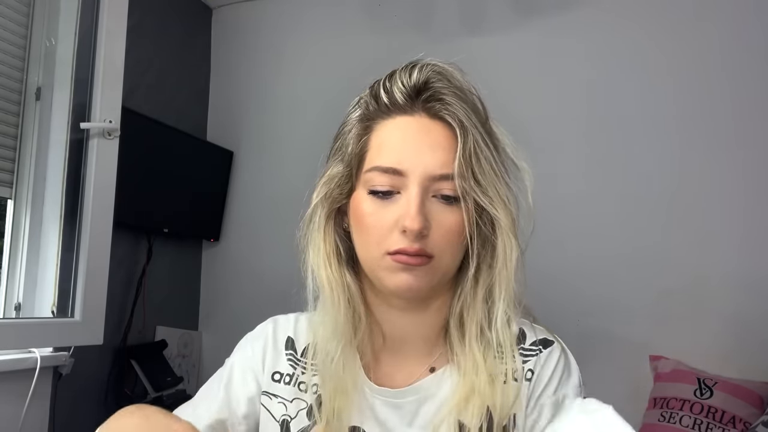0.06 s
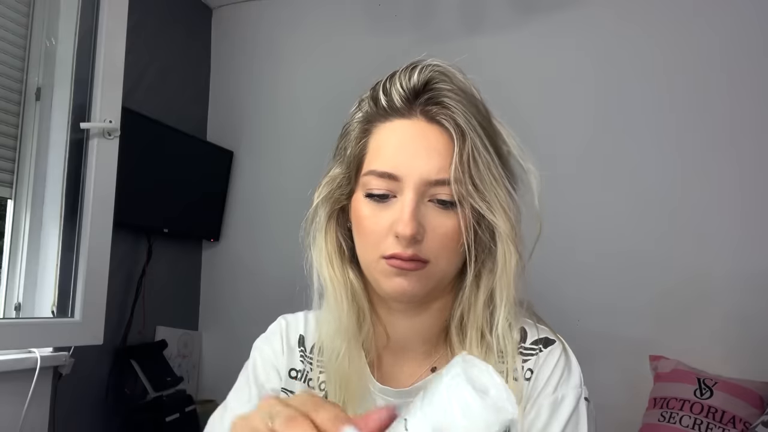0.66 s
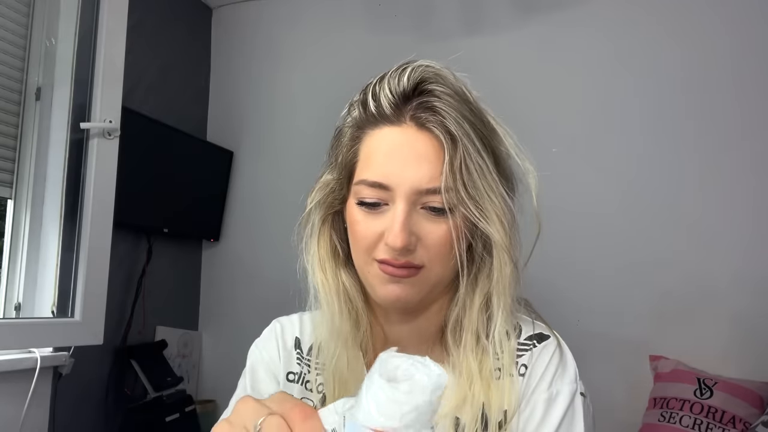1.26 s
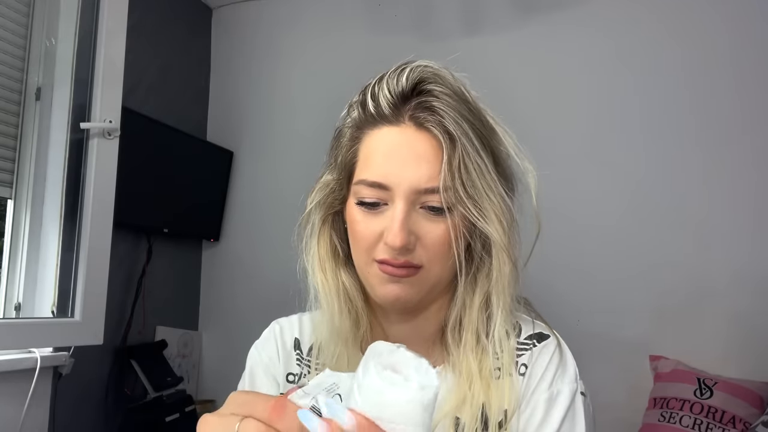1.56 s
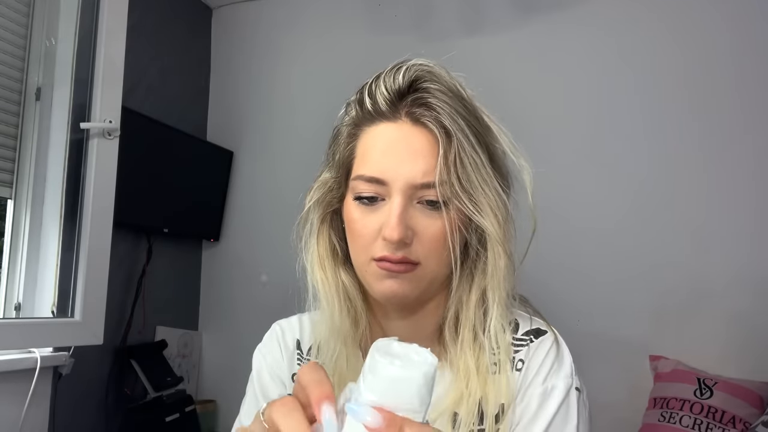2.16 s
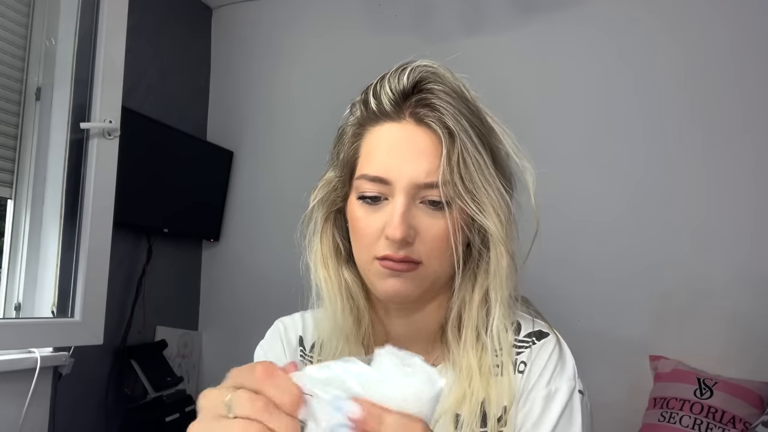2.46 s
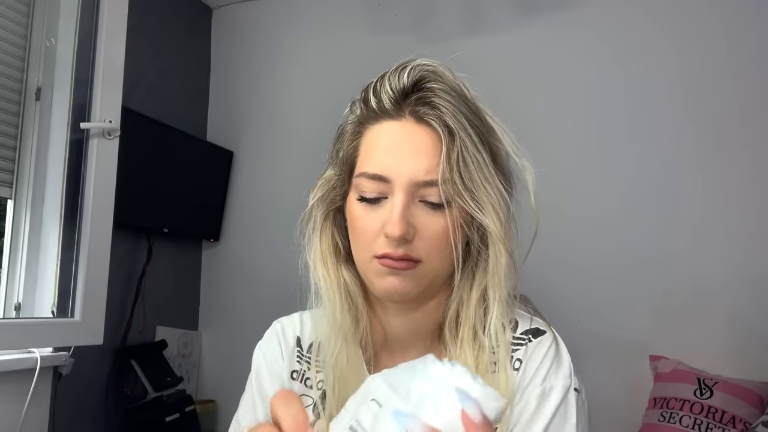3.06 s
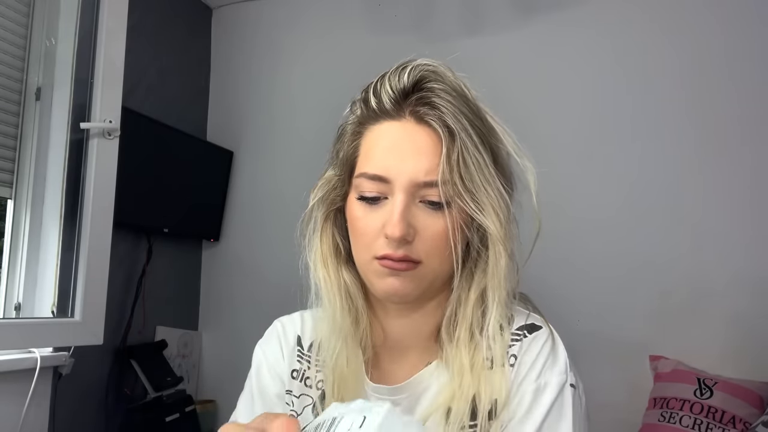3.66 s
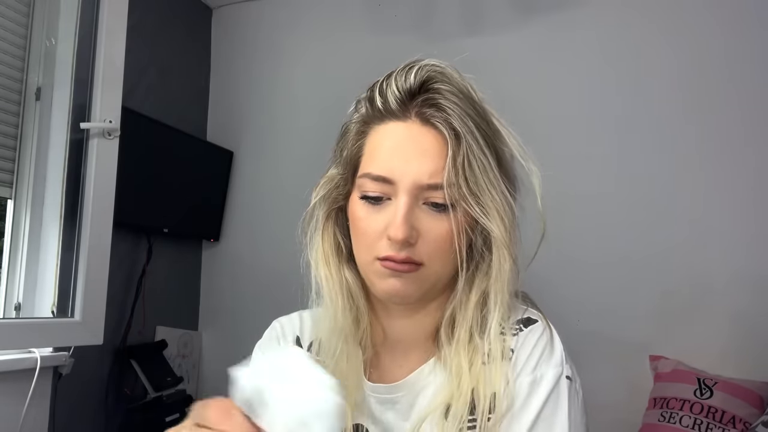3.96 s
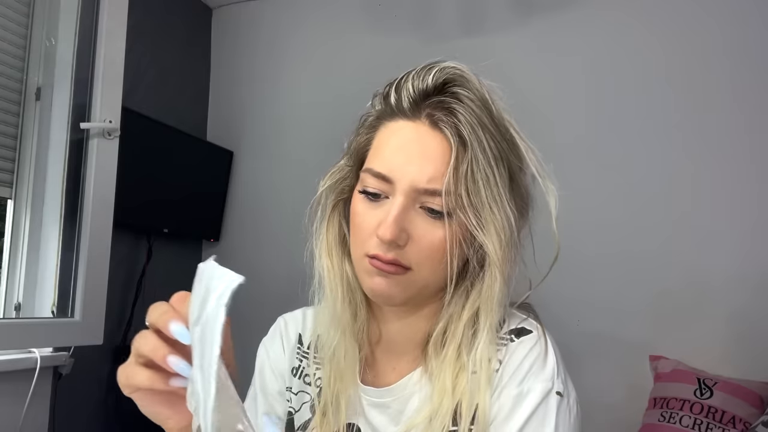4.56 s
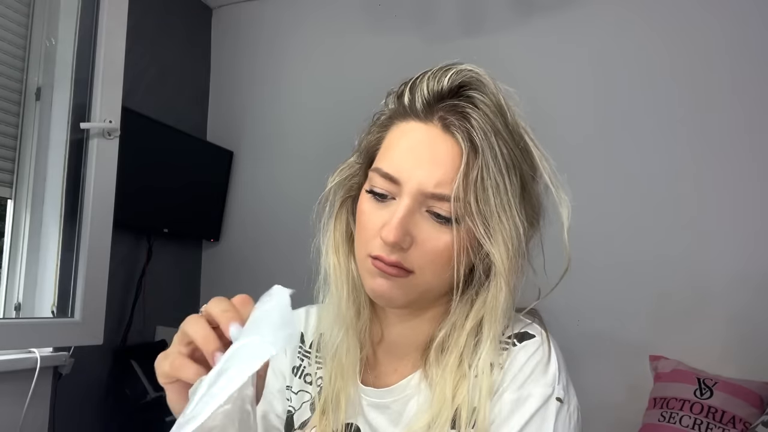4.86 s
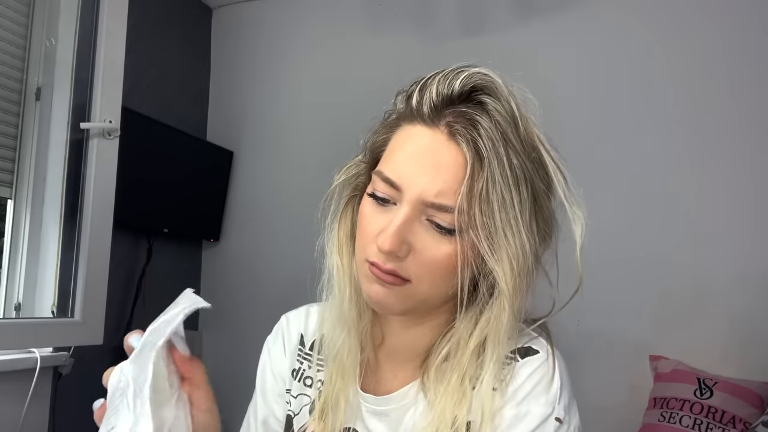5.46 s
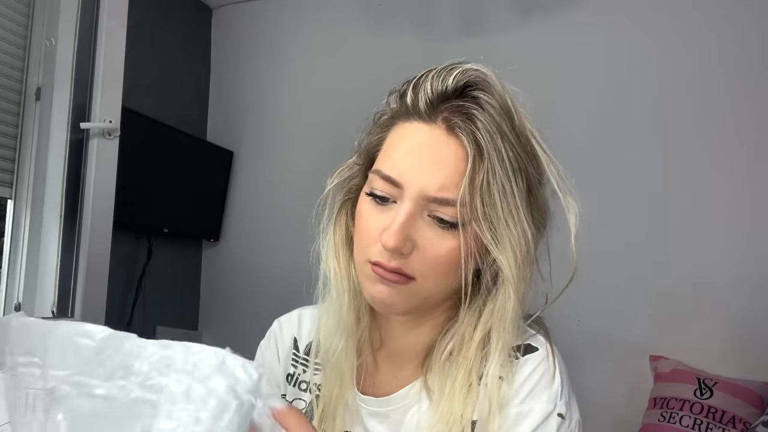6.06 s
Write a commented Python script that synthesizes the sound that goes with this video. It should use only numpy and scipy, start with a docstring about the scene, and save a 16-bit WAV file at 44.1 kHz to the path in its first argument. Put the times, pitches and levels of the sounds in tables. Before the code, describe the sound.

Close, uneven crinkling of a thin plastic bag being pulled open by hand, with sharp snaps and hollow pops indoors.

```python
"""Handling a plastic mailer bag

A plastic bag is tugged open and turned over by hand in a small room, close to a stereo microphone.
Thin film buckles in sudden steps: tiny creases make a steady crinkle, big ones snap alone or in runs.
Taut film pops, stiff folds knock, slack panels flop and a finger squeaks once by stick-slip friction.
Pops and flops excite the room's low modes. Signal pairs are sum and difference until the final mix."""
import sys
import numpy as np
from scipy import signal
from scipy.fft import rfft, irfft
from scipy.io import wavfile

SR = 44100
rng = np.random.default_rng(int(sys.argv[2]) if len(sys.argv) > 2 else 0)


def master(y):
    """Save y as 16-bit WAV."""
    cut = np.clip(np.atleast_2d(y).T, -1, 1)
    pcm = np.round(cut * 32767)  # scale
    wavfile.write(sys.argv[1], SR, pcm.astype(np.int16))


N = 278271
TIME = np.arange(N) / SR

# Tugs, squeezes and turns of the hands: t/s, duration/s, crinkle level/dB, rustle level/dB
HAND_STROKES = [(0.0, 0.0028, -45, -42), (0.142, 0.034, -55, -47), (0.254, 0.018, -64, -43.5),
                (0.367, 0.069, -71, -37.5), (0.785, 0.12, -54.5, -57.5), (0.922, 0.063, -50.5, -46.5),
                (1.083, 0.15, -54.5, -53), (1.233, 0.049, -42.5, -64), (1.35, 0.13, -48, -68),
                (1.474, 0.04, -34, -45), (1.71, 0.11, -47.5, -53), (1.776, 0.07, -52, -43),
                (1.907, 0.029, -60, -47), (2.041, 0.02, -47.5, -48), (2.202, 0.3, -51.5, -50.5),
                (2.41, 0.18, -45, -69), (2.455, 0.053, -34, -43), (2.6, 0.11, -44, -49),
                (2.707, 0.1, -45, -43.5), (2.883, 0.065, -49.5, -46), (2.981, 0.072, -42, -45.5),
                (3.16, 0.046, -45, -41.5), (3.245, 0.28, -41.5, -43.5), (3.61, 0.079, -45.5, -45.5),
                (3.69, 0.051, -48.5, -65), (3.814, 0.056, -40.5, -40), (3.887, 0.11, -46, -53),
                (4.005, 0.06, -35.5, -42.5), (4.138, 0.13, -47.5, -51.5), (4.3, 0.056, -41.5, -47),
                (4.503, 0.12, -47, -47.5), (4.66, 0.08, -62, -48.5), (4.785, 0.085, -46.5, -50.5),
                (4.854, 0.15, -44, -51.5), (5.013, 0.068, -47.5, -65), (5.153, 0.061, -47, -48),
                (5.342, 0.15, -50, -54.5), (5.504, 0.29, -45.5, -48), (5.653, 0.098, -42, -45),
                (5.92, 0.11, -47.5, -49), (6.042, 0.06, -50.5, -47.5), (6.158, 0.074, -52, -46.5)]
# Faint crinkle under the holding fingers: t/s, level/dB
GRIP_LEVEL = [(0.0, -59), (0.09, -65), (0.2, -64), (0.73, -65), (0.9, -59.5), (1.4, -48), (1.63, -58),
              (2.4, -51), (2.86, -64), (3.13, -54.5), (3.4, -52), (4.3, -51), (5.4, -50), (6.3, -52.5)]


def handling(attack_s=0.0066, release_s=0.014, grip_rustle_db=-5.0):
    """Incoherent addition: grip and strokes sum in power to give the crinkle and rustle envelopes."""
    power = from_db(in_time(GRIP_LEVEL) + np.array([[0], [grip_rustle_db]])) ** 2
    t = TIME[:SR]
    for start, duration, crinkle_db, rustle_db in HAND_STROKES:
        shape = np.minimum(t / attack_s, 1) * np.exp(-np.maximum(t - duration, 0) / release_s)
        add(power, start, (from_db([[crinkle_db], [rustle_db]]) * shape) ** 2)
    return np.sqrt(power)


# Spectra of small creases and of broad folds: f/Hz, relative level/dB
CRINKLE_SPECTRUM = [(200, -1), (700, -13), (1500, 1.5), (2300, 1), (3000, 4.5), (4500, 4), (8000, 3.5),
                    (10000, 5.5), (13000, -8.5), (16000, -16)]
RUSTLE_SPECTRUM = [(100, -46), (250, -4.5), (450, 0.5), (750, 2.5), (1200, -4.5), (2000, -5.5),
                   (5000, -24.5)]


def crinkle(crinkle_envelope, rustle_envelope, rustle_db=-4.0):
    """Buckling noise: small creases crackle brightly, broad folds rustle lower, as the hands work."""
    small = creases(per_s=2600, spread_db=3.5, clump_db=4.5, ring_s=0.0009, patches=20)
    bright = flex(colour(small, CRINKLE_SPECTRUM))
    broad = creases(per_s=1200, spread_db=5.0, clump_db=1.0, ring_s=0.0015, patches=10)
    dull = colour(broad, RUSTLE_SPECTRUM)
    return crinkle_envelope * bright + rustle_envelope * from_db(rustle_db) * dull


def creases(per_s, spread_db, clump_db, ring_s, patches):
    """Shot noise: clumps of very unequal buckling impulses ring several patches of film; unit rms."""
    buckles = rng.random(N) < per_s * from_db(clump_db * drift(70)) / SR
    sizes = from_db(spread_db * np.minimum(rng.exponential(1, N), 4.5)) * rng.choice([-1, 1], N)
    patch = rng.integers(0, patches, N)
    impulses = (buckles * sizes)[None]
    return unit_rms(sum(convolve(impulses * (patch == k), burst(ring_s, 256)) for k in range(patches)))


def flex(sound, span_hz=(1400, 6300), swing_db=0.5, per_s=14, q=5.0):
    """Time-varying resonance: broad peaks swell and fade as the film changes shape; unit rms."""
    for hz in np.geomspace(*span_hz, 7):
        sound = resonate(sound, hz, q, swing_db * drift(per_s))
    return unit_rms(sound)


# The biggest creases flipping: t/s, level/dB, panel f/Hz, treble lift/dB
BIG_SNAPS = [(0.163, -32, 2100, -15), (0.243, -34, 5000, 6), (0.266, -25.5, 3580, -29),
             (0.3808, -17.5, 2250, -1), (0.4288, -16, 1500, 4), (0.4312, -7.5, 4350, 7.5),
             (0.448, -12.5, 4200, -16), (0.4621, -37, 725, -20), (0.767, -35.5, 710, 7),
             (1.1302, -30.5, 1400, 2), (1.152, -20.5, 4640, 1), (1.2365, -22.5, 1700, -21),
             (1.254, -22.5, 554, -10), (1.316, -30, 1900, -12), (1.3478, -23.5, 2000, 2),
             (1.3525, -24.5, 2070, 7), (1.4762, -29, 4160, 8), (1.5153, -27, 2020, -10),
             (1.5311, -29.5, 4550, -10), (1.7988, -34, 4000, 9.5), (2.049, -31.5, 2760, 4),
             (2.135, -29.5, 5500, -5), (2.2924, -26, 4200, 9), (2.365, -37, 477, 11), (2.449, -36, 5100, 2),
             (2.4812, -30, 3000, 0), (2.507, -27.5, 620, 8), (2.373, -32.5, 4000, -10),
             (2.7738, -29.5, 2920, -16), (2.8984, -32.5, 4130, 7), (2.9416, -34, 3930, 5),
             (3.033, -35, 5000, 16), (3.184, -34, 1880, 4), (3.285, -28.5, 1910, -13),
             (3.341, -24.5, 2970, -19), (3.4079, -20.5, 1500, 4), (3.4139, -26, 5900, 12),
             (3.43, -27, 6070, 0), (3.4683, -25, 480, -17), (3.5135, -29, 810, -18),
             (3.775, -35, 4320, 11.5), (3.8257, -33, 5000, -6), (3.912, -39, 4060, -14),
             (3.9249, -33, 4500, -15), (3.9706, -31, 4900, 3), (4.01, -26.5, 3200, 14),
             (4.016, -28.5, 1740, 5), (4.06, -25, 2900, -15), (4.1333, -33, 4060, -10),
             (4.1647, -35, 3800, 14), (4.2148, -27, 3670, 6), (4.296, -26, 5000, -18),
             (4.338, -27, 4300, -12), (4.38, -27.5, 2920, -17), (4.3985, -37, 4650, 20.5),
             (4.4115, -33.5, 5230, 1), (4.478, -32.5, 2730, -12), (4.5106, -27, 4200, -15),
             (4.5155, -41, 3200, -18), (4.6547, -30, 4140, 4), (4.667, -34, 3270, -8),
             (4.8547, -29, 4140, -14), (4.9088, -28.5, 4240, -20), (4.973, -29.5, 4400, -6),
             (5.145, -32, 5030, 9), (5.1615, -30.5, 4040, -15.5), (5.2162, -29.5, 4620, 11.5),
             (5.272, -35, 3220, -10), (5.3592, -30.5, 4220, 3), (5.451, -29, 4560, 4),
             (5.4645, -34, 4630, 6), (5.489, -34, 5000, 7), (5.571, -33.5, 3630, -17),
             (5.636, -31, 5000, 5), (5.684, -28, 5000, 10), (5.6964, -12, 4700, -11),
             (5.7875, -30.5, 2950, 10), (5.814, -36, 4600, 14), (5.988, -28.5, 450, -19),
             (6.163, -37, 2160, 6), (6.2196, -33, 4120, 11.5)]
# Spectrum of a crease's tick: f/Hz, relative level/dB
TICK_SPECTRUM = [(200, -2.5), (700, -8.5), (1600, 3), (3000, 3.5), (5000, 1.5), (8000, 3), (10000, 0.5),
                 (13000, -17.5), (16000, -37)]


def snaps(rows, tick_db=-2.0, top_db=6.0, panel_db=0.5, tight_hz=4500, db_per_octave=3.5):
    """Snap-through buckling: a crease ticks and shakes its panel, a tight one more than a slack one."""
    ticks, panels = np.zeros((2, 2, N))
    for start, db, hz, lift_db in rows:
        body = burst(decay_s=0.0017)
        body *= rise(TIME[:body.shape[1]], rise_s=0.00028)
        top = from_db(lift_db + top_db) * highpass(burst(decay_s=0.00056), hz=9500)
        add(ticks, start, from_db(db + tick_db) * (body + top))
        ring_db = db + panel_db - db_per_octave * np.log2(tight_hz / hz)
        add(panels, start, from_db(ring_db) * panel(hz, cycles=4.26, spread=0.233))
    return colour(ticks, TICK_SPECTRUM) + panels


def snap_edges(edge_db=-14.0):
    """Direct sound: the bright edge of a big snap reaches both channels at once, dry and centred."""
    out = np.zeros((1, N))
    for start, db, _, lift_db in BIG_SNAPS:
        add(out, start, from_db(db + lift_db + edge_db) * burst(decay_s=0.00015)[:1])
    return highpass(out, hz=8500)


def stray_snaps(crinkle_envelope, per_s=7.8, above_db=15, spread_db=4.5, max_db=-44.5, lift_db=12):
    """Poisson process: rows of lesser snaps at random times, scaled to the crinkle around them."""
    wait, pitch, size = rng.random((3, 160))
    times = np.cumsum(-np.log(1 - wait)) / per_s
    crinkle_db = 20 * np.log10(np.interp(times, TIME, crinkle_envelope))
    levels = np.minimum(crinkle_db + above_db + spread_db * (2 * size - 1), max_db)
    panel_hz = np.interp(pitch, [0, 1], [1500, 5000])
    return [(start, db, hz, lift_db) for start, db, hz in zip(times, levels, panel_hz) if start < TIME[-1]]


# Runs of creases giving way: t/s, level/dB, decay time/s, treble lift/dB
CREASE_RUNS = [(0.425, -30, 0.0027, -20), (0.452, -31, 0.0033, -20), (0.458, -39, 0.011, -18),
               (1.357, -42, 0.0095, -2), (1.478, -30, 0.018, -16), (2.483, -30, 0.044, -6),
               (3.315, -38.5, 0.066, -12), (3.4, -40, 0.014, -10), (3.408, -36, 0.038, -8),
               (5.695, -23, 0.0055, -15), (5.703, -40, 0.073, -5)]


def crumples():
    """Avalanche: one crease trips its neighbours in a dying run of clicks; tight film adds a sizzle."""
    envelopes, t = np.zeros((2, N)), TIME[:16384]
    for start, db, decay_s, lift_db in CREASE_RUNS:
        shape = rise(t, rise_s=0.00068) * np.exp(-(t / decay_s) ** 2)
        add(envelopes, start, from_db([[db], [db + lift_db]]) * shape)
    run, sizzle = envelopes
    clicks = creases(per_s=5400, spread_db=3.5, clump_db=6.5, ring_s=0.00031, patches=20)
    return run * colour(clicks, TICK_SPECTRUM) + sizzle * highpass(clicks, hz=11000)


# Taut film letting go: t/s, level/dB, f/Hz, leftward bias/dB
FILM_POPS = [(0.383, -26, 514, 10), (0.429, -20, 1090, 22), (0.442, -20, 563, 10), (0.463, -18, 710, 0.5),
             (1.133, -37, 850, 20), (1.152, -40, 1400, 23), (1.254, -39.5, 577, -4), (1.35, -40, 1500, 20),
             (1.485, -35, 440, 1), (2.362, -39, 316, 0), (2.42, -38, 580, 12), (2.48, -29, 1180, 0),
             (2.502, -23.5, 590, 24), (2.723, -35, 540, 22), (2.74, -37, 710, 17), (3.039, -34.5, 745, -1),
             (3.298, -42, 890, -1), (3.342, -39, 1100, 9), (3.409, -25.5, 1590, 9), (3.485, -37.5, 580, 9),
             (3.84, -38.5, 372, -3.5), (4.033, -37.5, 368, 15), (4.064, -30.5, 1150, 8),
             (4.317, -41, 750, 6), (4.511, -37, 900, 5), (4.587, -43.5, 790, 4), (5.672, -36, 980, 5),
             (5.682, -32, 685, -5), (5.699, -29, 880, 3), (5.715, -39, 810, 9), (5.747, -38.5, 920, 17),
             (5.873, -44, 594, 8), (5.931, -42.5, 740, 19), (6.057, -39.5, 670, 14)]
# Spectrum of the puff of air: f/Hz, relative level/dB
PUFF_SPECTRUM = [(50, -16), (120, -12), (230, -20), (400, -4), (650, -9), (850, -10), (1100, -12),
                 (2000, -12.5), (5000, -24.5), (12000, -49)]


def pops(puff_db=-2.0, lean=0.87):
    """Sudden release of tension: stretched film gives a puff of air and a hollow ring to one side."""
    puffs, rings = np.zeros((2, 2, N))
    for start, db, hz, left_db in FILM_POPS:
        ring = panel(hz, cycles=2.9, spread=0.252)
        pan = np.tanh(lean * np.log(from_db(left_db)))
        add(rings, start, from_db(db) * (ring + pan * ring[::-1]))
        add(puffs, start, from_db(db + puff_db) * burst(decay_s=0.008))
    return rings + colour(puffs, PUFF_SPECTRUM)


# Stiff folds giving way: crest t/s, level/dB, f/Hz, leftward bias/dB
FOLD_KNOCKS = [(0.4300, -4, 590, 6), (0.4445, -14, 400, -2), (0.4638, -12.5, 930, 3), (0.4800, -13, 650, 5),
               (1.489, -40, 390, 5), (1.816, -37, 422, 9), (3.044, -26, 510, 12), (3.412, -25, 396, 2),
               (3.513, -32, 744, 2), (4.034, -27, 397, 11), (4.667, -40, 567, 5), (5.683, -25.5, 425, 15),
               (5.701, -37, 750, 2)]


def knocks(cycles=0.57, lean=0.93):
    """Pressure pulse: a stiff fold gives the air one hard push that swings back at once."""
    out, t = np.zeros((2, N)), TIME[:512] - TIME[256]
    for crest, db, hz, left_db in FOLD_KNOCKS:
        push = -np.cos(2 * np.pi * hz * t) * np.exp(-(t * hz / cycles) ** 2)
        pan = np.tanh(lean * np.log(from_db(left_db)) / 2)
        add(out, crest + t[0], from_db(db) * push * np.array([[1], [pan]]))
    return out


# Slack panels flipping over: t/s, level/dB, first f/Hz, final f/Hz, slackening time/s, decay time/s
PANEL_FLOPS = [(0.38, -20.5, 416, 237, 0.0029, 0.019), (0.386, -30, 200, 105, 0.0038, 0.02),
               (0.427, -16.5, 475, 306, 0.0012, 0.018), (0.440, -17, 338, 207.5, 0.0059, 0.015),
               (0.443, -18, 302, 61, 0.0027, 0.021), (0.463, -22, 300, 133, 0.0023, 0.012),
               (0.464, -14.5, 332, 240, 0.002, 0.017), (2.544, -33.5, 500, 94, 0.0035, 0.021),
               (3.042, -24, 660, 99, 0.0027, 0.02), (3.342, -32.5, 400, 137, 0.0026, 0.013),
               (3.409, -25.5, 490, 111, 0.0034, 0.022), (3.709, -29, 410, 297, 0.0037, 0.011),
               (3.725, -25.5, 258, 132, 0.0031, 0.004), (3.825, -34, 261, 100, 0.0051, 0.038),
               (4.033, -32, 400, 74.6, 0.0035, 0.023), (5.355, -32.5, 603, 137, 0.0037, 0.0061),
               (5.719, -24, 250, 70.4, 0.0014, 0.013), (5.764, -26.5, 200, 67.6, 0.0028, 0.023),
               (5.987, -24, 576, 187, 0.0039, 0.0085), (6.21, -33, 298, 75, 0.0032, 0.022)]


def flops():
    """Membrane vibration: the pitch of a flipped panel falls as the tension leaves it."""
    out, t = np.zeros((2, N)), TIME[:8192]
    for start, db, first_hz, final_hz, slacken_s, decay_s in PANEL_FLOPS:
        hz = final_hz + (first_hz - final_hz) * np.exp(-t / slacken_s)
        phase = 2 * np.pi * np.cumsum(hz) / SR
        swing = from_db(db) * rise(t, rise_s=0.0025) * np.exp(-t / decay_s)
        # the difference channel follows the pressure slope
        add(out, start, swing * np.array([np.sin(phase), np.cos(phase) / 2]))
    return colour(out, [(22, -40), (38, -4), (55, -0.5)], keep_power=False)


# A finger sliding over the film: t/s, f/Hz, level/dB, duration/s
FINGER_SQUEAKS = [(6.05, 300, -35.5, 0.055)]


def squeaks(overtone_db=-7.5, jitter=0.14):
    """Stick-slip friction: skin catches on the film for a few uneven cycles of three harmonics."""
    out = np.zeros((2, N))
    for start, hz, db, duration in FINGER_SQUEAKS:
        t = TIME[:int(duration * SR)]
        phase = 2 * np.pi * np.cumsum(hz * (1 + jitter * drift(290)[:len(t)])) / SR
        slips = sum(from_db(overtone_db * k) * np.sin((k + 1) * phase) for k in range(3))
        swell = np.sin(np.pi * np.sqrt(t / duration))
        add(out[:1], start, from_db(db) * swell * slips)
    return out


# How tightly the bag is bunched: t/s, tightness (0 to 1)
TIGHTNESS = [(1.7, 0.6), (2.3, 0.73), (3.5, 0.73), (4.3, 0.63), (4.6, 0)]
# Peaks and dips of the bunched bag: f/Hz, bandwidth/Hz, gain at tightness 1/dB
BAG_RESONANCES = [(1150, 130, -2), (2720, 105, -12.5), (2800, 410, 7.5), (3320, 870, -6.5),
                  (4400, 2100, -4)]


def bunch(sound):
    """Resonant filtering: the bunched bag favours some pitches and swallows others until it unfolds."""
    tightness = in_time(TIGHTNESS)
    for hz, width_hz, db in BAG_RESONANCES:
        sound = resonate(sound, hz, hz / width_hz, db * tightness)
    return sound


def burst(decay_s, size=4096):
    """High modal density: the many damped modes of a patch of film merge into decaying noise."""
    fade = np.exp(-TIME[:size] / decay_s)
    return unit_energy(rng.standard_normal((2, size)) * fade) * np.linalg.norm(fade)


def panel(hz, cycles, spread):
    """Damped free vibration: five modes of a stretch of film, near hz, fall to 1/e over `cycles`."""
    t = TIME[:4096]
    modes_hz = hz * np.exp(spread * rng.standard_normal((5, 1)))
    phases = rng.uniform(0, 2 * np.pi, (2, 5, 1))
    fade = np.exp(-t * hz / cycles) * rise(t, rise_s=1 / (np.pi * hz))
    ring = np.sin(2 * np.pi * modes_hz * t + phases).sum(axis=1) * fade
    return unit_energy(ring) * np.linalg.norm(fade)


# Reverberation time of the room: f/Hz, T60/s
REVERB_TIMES = [(100, 0.13), (400, 0.19), (1000, 0.28), (4000, 0.23), (12000, 0.25)]


def reflections(size=32768):
    """Diffuse decay: close walls give a dense, short tail, each band dying at its own rate."""
    t, hz = TIME[:size], np.fft.rfftfreq(size, 1 / SR)
    white, tail = rfft(rng.standard_normal((2, size))), 0
    edges_hz = [0, 200, 600, 1500, 3500, 8000, SR / 2]
    for low, high in zip(edges_hz, edges_hz[1:]):
        band = irfft(white * ((hz >= low) & (hz < high)))
        t60 = at_hz(REVERB_TIMES, (low + high) / 2)
        tail = tail + band * from_db(-60 * t / t60)
    return unit_energy(tail * rise(t, rise_s=0.00015))


def reverberation(sound, wet_db=-4.0, bass_db=-9.5, treble_db=-12.0, places=5):
    """Reflection paths depend on position, so they change as the sound wanders over the bag."""
    shares = np.array([drift(60) for _ in range(places)])
    shares /= np.linalg.norm(shares, axis=0)
    wet = sum(convolve(sound * share, reflections()) for share in shares)
    spectrum = [(150, bass_db), (500, wet_db), (8500, wet_db), (11000, treble_db)]
    return colour(wet, spectrum, keep_power=False)


# Low modes of the room: f/Hz, relative level/dB, T60/s
STANDING_WAVES = [(58.3, -5.5, 0.73), (126.1, -2.5, 0.4), (210.2, -1.5, 0.25), (235.3, -8.5, 0.28),
                  (307, -12.5, 0.69), (329.4, -10.5, 0.64), (384, -8.5, 0.6)]


def room_modes(sound, modes_db=-47.5):
    """Standing waves: in the bass the room rings on at a few separate frequencies."""
    t = TIME[:32768]
    boom = sum(from_db(db + modes_db - 60 * t / t60) * np.cos(2 * np.pi * hz * t)
               for hz, db, t60 in STANDING_WAVES)
    return convolve(sound, boom[None])


# Rumble as the bag shifts in the hands: t/s, level/dB
SHIFTING_LEVEL = [(0.0, -50), (1.05, -53), (1.85, -53), (2.3, -46), (2.65, -53.5), (3.2, -49),
                  (4.35, -53.5), (4.8, -53.5), (5.35, -53), (5.95, -47), (6.3, -50)]
# Spectrum of the moving air: f/Hz, relative level/dB
RUMBLE_SPECTRUM = [(20, -21), (36, -18), (52, -2.5), (62, -7.5), (80, -4), (100, -14.5), (125, 2),
                   (170, -10.5), (260, -14), (500, -19.5), (2000, -63)]


def rumble(rustle_envelope, sway_db=-7.5, stir_db=-17.5, settle_s=0.072):
    """Air displacement: the shifting bag, its broad folds and each flop add power to a low noise."""
    power = from_db(in_time(SHIFTING_LEVEL)) ** 2 + (from_db(sway_db) * rustle_envelope[None]) ** 2
    for start, db, *_ in PANEL_FLOPS:
        add(power, start, (from_db(db + stir_db) * np.exp(-TIME[:SR] / settle_s)) ** 2)
    return np.sqrt(power) * colour(rng.standard_normal((2, N)), RUMBLE_SPECTRUM)


# Spectrum of the quiet room: f/Hz, relative level/dB
AMBIENCE_SPECTRUM = [(20, -36.5), (55, 10.5), (130, -25), (280, -20), (600, -28), (1500, -21),
                     (3000, -35.5), (8000, -24.5), (16000, -54)]


def ambience(level_db=-58.0):
    """Stationary noise: the steady, bass-heavy quiet of the room."""
    return from_db(level_db) * colour(rng.standard_normal((2, N)), AMBIENCE_SPECTRUM)


# Tone of the stereo sum and difference: f/Hz, gain/dB
# The centre drops out around 10-13 kHz, so the top treble sounds wide.
MID_TONE = [(25, -9.5), (50, -1), (1000, -3.5), (7500, -3), (9200, -9), (10600, -30.5), (12300, -49),
            (13800, 5.5), (16000, -4.5)]
SIDE_TONE = [(60, -15.5), (130, -13), (280, -7.5), (450, -2), (750, -2.5), (1100, 0.5), (1600, -5.5),
             (3100, -5), (5000, -2.5), (7500, -2), (10000, -2), (15000, 5)]


def stereo(field, centred):
    """Mid-side stereo: sum and difference become left and right; `centred` joins the sum unfiltered."""
    mid = colour(field[:1], MID_TONE, keep_power=False) + centred
    side = colour(field[1:], SIDE_TONE, keep_power=False)
    return np.vstack([mid + side, mid - side])


def from_db(db):
    """Decibels to amplitude ratio."""
    return 10 ** (np.asarray(db) / 20)


def unit_rms(x):
    """Normalise to unit mean power."""
    return x / np.sqrt(np.mean(x ** 2) + 1e-20)


def unit_energy(x):
    """Normalise each channel to unit energy."""
    return x / np.linalg.norm(x, axis=1, keepdims=True)


def rise(t, rise_s):
    """Exponential approach from 0 to 1."""
    return 1 - np.exp(-t / rise_s)


def drift(per_s):
    """Random wander: straight lines between per_s Gaussian values a second."""
    knots = rng.standard_normal(8192)
    return np.interp(TIME * per_s, np.arange(len(knots)), knots)


def in_time(curve):
    """Linear interpolation of a curve at every sample."""
    return np.interp(TIME, *np.transpose(curve))


def at_hz(curve, hz):
    """Interpolation on a log-frequency axis."""
    f, value = np.transpose(curve)
    return np.interp(np.log(np.maximum(hz, 1)), np.log(f), value)


def add(out, start, sound):
    """Superposition of a short sound from `start` seconds on."""
    i = max(round(start * SR), 0)
    out[:, i:i + sound.shape[-1]] += sound[..., :N - i]


def convolve(x, response):
    """Convolution with an impulse response, cut to the scene's length."""
    return signal.oaconvolve(x, response, axes=-1)[:, :N]


def highpass(x, hz):
    """Second-order high-pass filter."""
    return signal.lfilter(*signal.butter(2, hz, "high", fs=SR), x)


def resonate(x, hz, q, gain_db):
    """Second-order resonance that lifts or cuts one band."""
    return x + (from_db(gain_db) - 1) * signal.lfilter(*signal.iirpeak(hz, q, fs=SR), x)


def colour(x, spectrum, keep_power=True, size=4096):
    """Minimum-phase filter with the given spectrum; folding the cepstrum makes it causal."""
    gain = from_db(at_hz(spectrum, np.fft.rfftfreq(size, 1 / SR)))
    cepstrum = irfft(np.log(gain))
    cepstrum[1:size // 2] *= 2
    cepstrum[size // 2 + 1:] = 0
    response = irfft(np.exp(rfft(cepstrum)))[None]
    return convolve(x, unit_energy(response) if keep_power else response)


def scene(close_to_room_db=-3.0):
    """Direct plus reverberant field: knocks and flops face the microphone and so sound drier."""
    crinkle_envelope, rustle_envelope = handling()
    film = crinkle(crinkle_envelope, rustle_envelope) + crumples() + pops() + squeaks()
    film = bunch(film + snaps(BIG_SNAPS + stray_snaps(crinkle_envelope)))
    close = knocks() + flops()
    into_room = film + from_db(close_to_room_db) * close
    room = reverberation(into_room) + room_modes(into_room)
    field = film + close + room + rumble(rustle_envelope) + ambience()
    return stereo(field, centred=snap_edges())


def record(dry, ceiling=0.95, cutoff_hz=16500):
    """Soft saturation rounds the highest peaks, and a steep low-pass filter cuts the top."""
    lowpass = signal.ellip(10, 0.1, 80, cutoff_hz, fs=SR, output="sos")
    return signal.sosfilt(lowpass, ceiling * np.tanh(dry / ceiling))


dry = scene()
out = record(dry)
master(out)
```